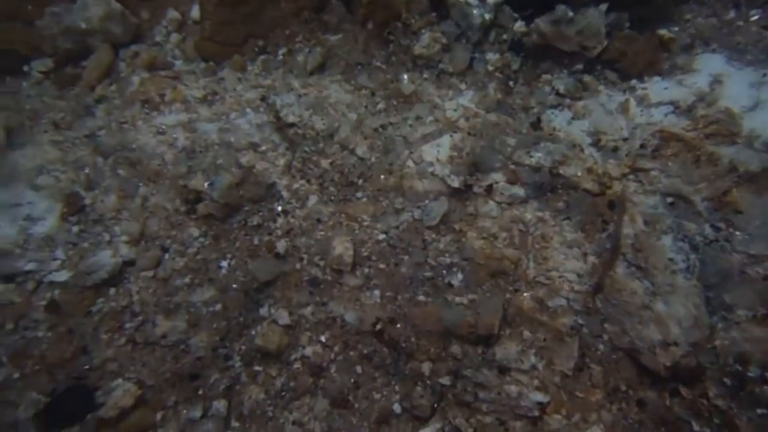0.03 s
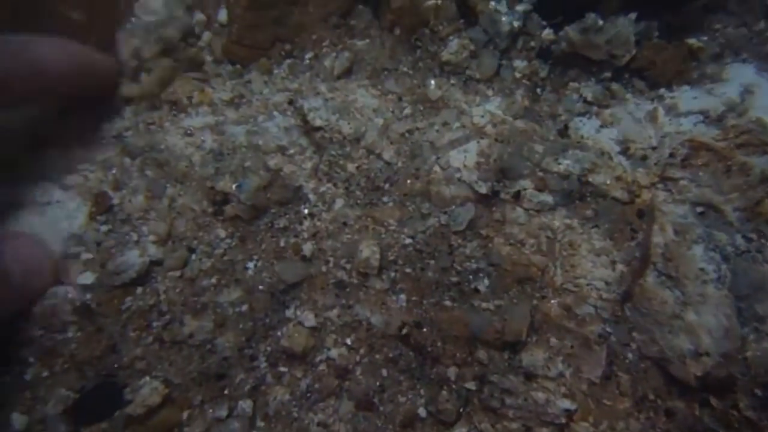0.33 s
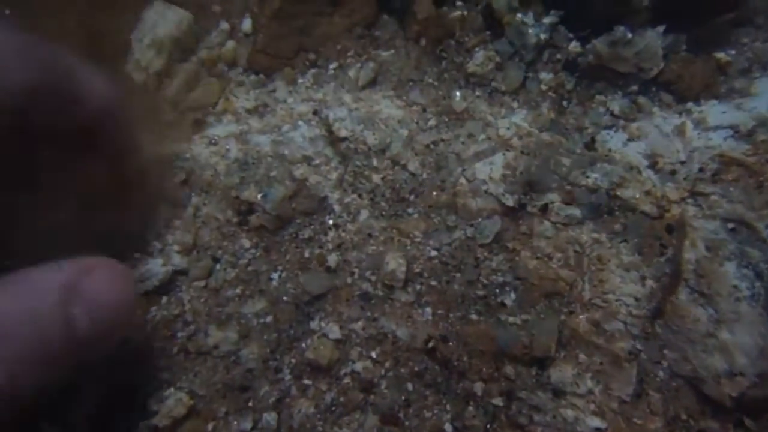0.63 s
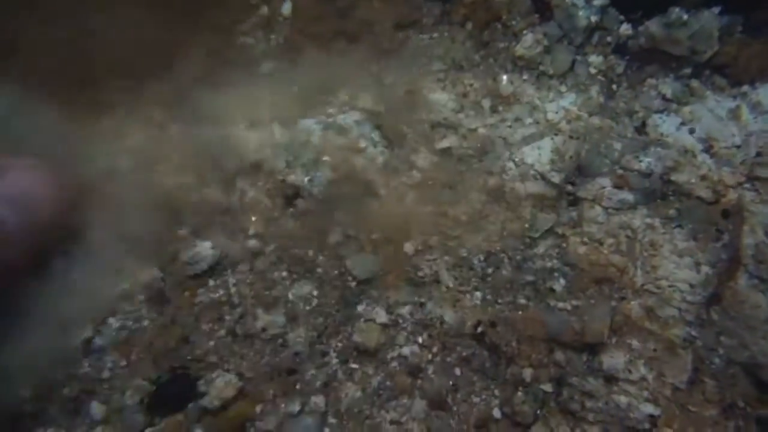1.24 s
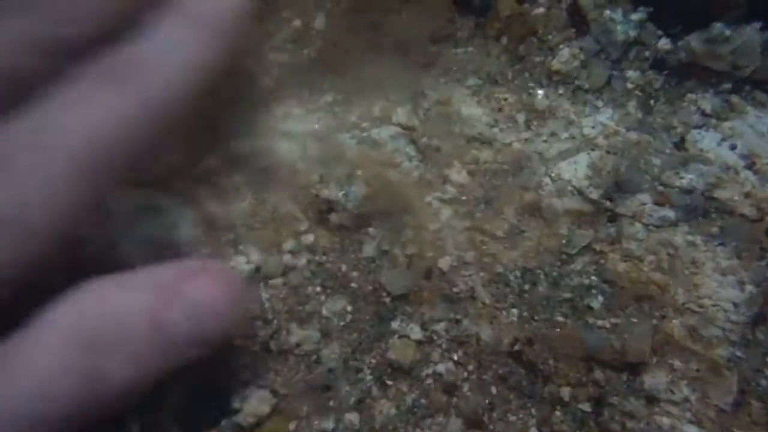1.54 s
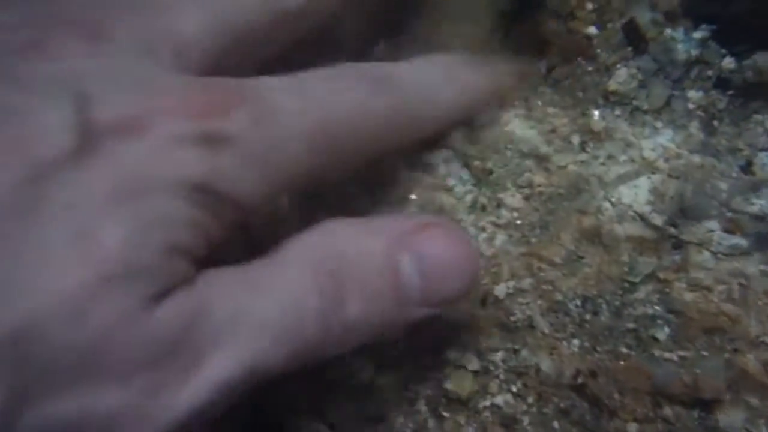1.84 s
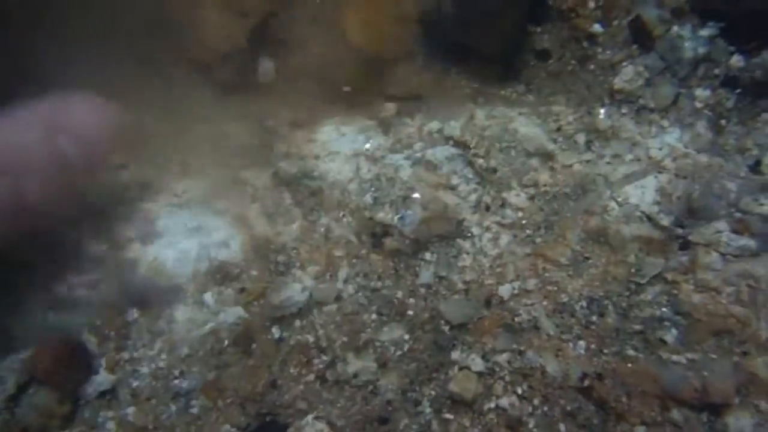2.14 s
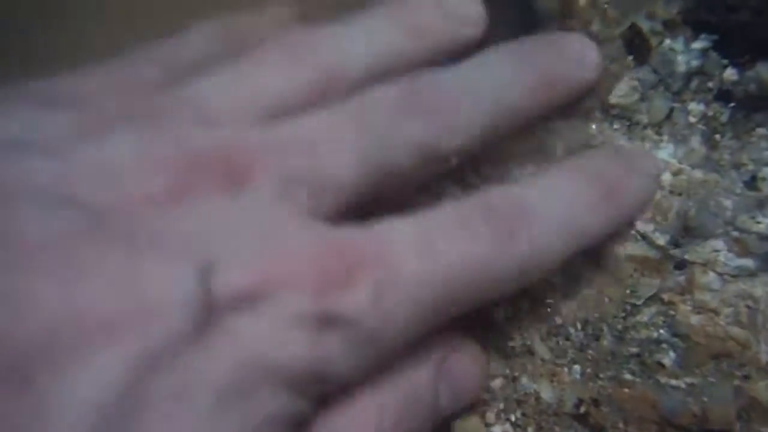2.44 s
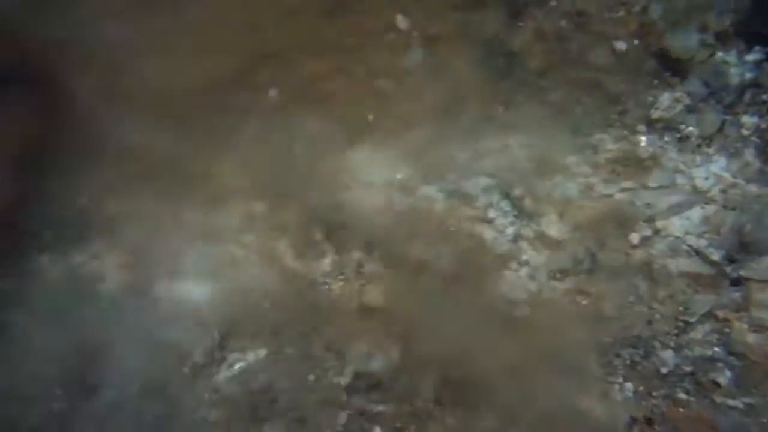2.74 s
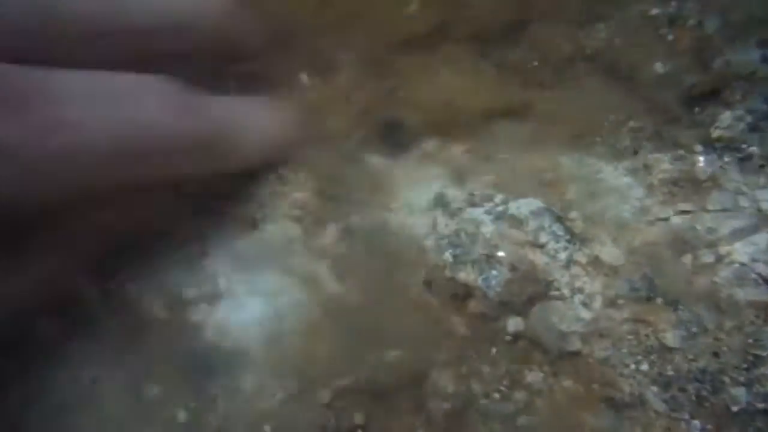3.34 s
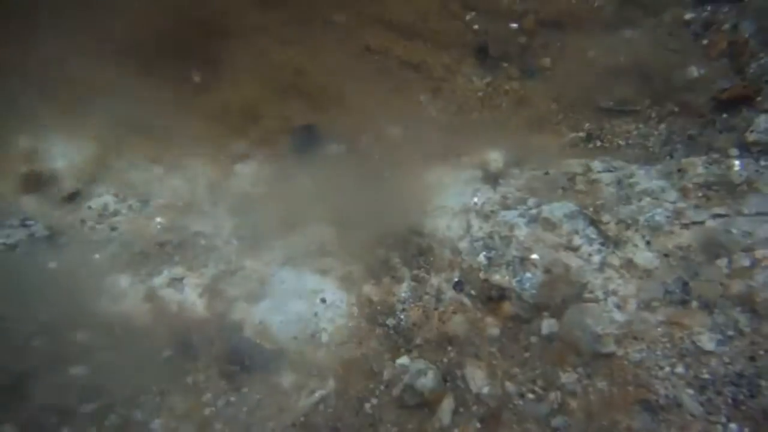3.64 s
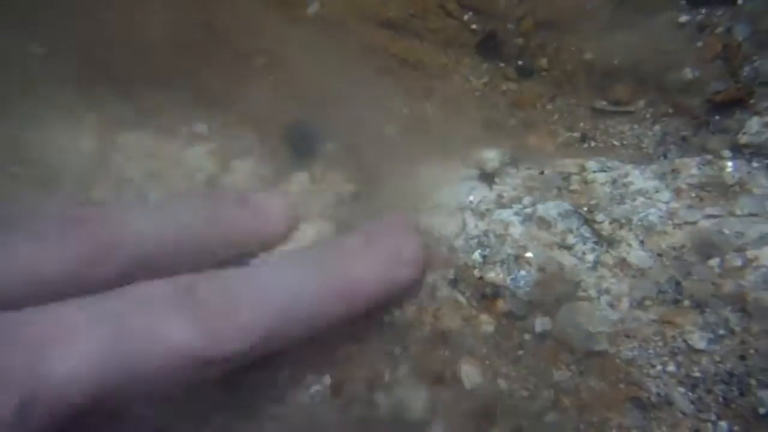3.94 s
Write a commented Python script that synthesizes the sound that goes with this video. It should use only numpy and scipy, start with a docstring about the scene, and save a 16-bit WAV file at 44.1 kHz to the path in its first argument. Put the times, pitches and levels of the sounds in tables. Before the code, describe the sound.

Underwater gravel crunches under repeated hand strokes, with low rumbling water and soft microphone bumps.

```python
"""A deep rumble of pushed water, then the crunch of a hand sweeping six times over submerged gravel.
The microphone is under water, close to the hand, inside a camera's sealed housing. Grains crunch and
tick through the housing's resonances, stones squeak and click, and the rubbing makes the housing growl.
Bumps on it thud and overload the microphone; behind it all the electronics hiss and whine faintly."""
import sys
import numpy as np
from scipy import signal
from scipy.fft import rfft, irfft
from scipy.io import wavfile
from scipy.ndimage import uniform_filter1d

SR = 44100
rng = np.random.default_rng(int(sys.argv[2]) if len(sys.argv) > 2 else 0)


def transcribe(signal):
    """Save signal, clipped to [-1, 1], as a 16-bit WAV file at the path in sys.argv[1]."""
    frames = np.atleast_2d(signal).T
    limited = np.clip(frames, -1, 1)
    pcm = np.round(limited * 32767).astype(np.int16)
    wavfile.write(sys.argv[1], SR, pcm)


N = 176400
T = np.arange(N) / SR

# the housing's high resonances, heard in fine sand and pebble cracks: frequency_hz, level_db
HOUSING_TREBLE = [(4000, -42.5), (4850, -21.5), (5200, -4.5), (5560, 2.5), (6100, -12.5), (6700, -5.5),
                  (7250, -12), (7650, -10.5), (8500, -18), (10200, -17.5), (11300, -40), (12800, -22.5),
                  (14000, -41), (15500, -35)]


def from_db(db):
    """Decibels to gain."""
    return 10 ** (np.asarray(db) / 20)


def unit_rms(x):
    """Scale to unit power."""
    return x / np.sqrt(np.mean(x ** 2) + 1e-20)


def curves(tables):
    """Join tables in time order and draw one curve through each level column."""
    rows = np.vstack(tables)
    time_s, *columns = rows[np.argsort(rows[:, 0])].T
    return [np.interp(T, time_s, column) for column in columns]


def colour(x, spectrum):
    """Causal (minimum-phase) filter with the given spectrum; the result has unit power."""
    hz, db = np.transpose(spectrum)
    grid_hz = np.maximum(np.fft.rfftfreq(N, 1 / SR), 1)
    gain = from_db(np.interp(np.log(grid_hz), np.log(hz), db))
    cepstrum = irfft(np.log(gain), N)
    cepstrum[1:N // 2] *= 2
    cepstrum[N // 2 + 1:] = 0
    return unit_rms(irfft(rfft(x) * np.exp(rfft(cepstrum)), N))


def drift(rate_hz):
    """Random wander of unit power, mostly slower than rate_hz."""
    rolloff = 1 + (np.fft.rfftfreq(N, 1 / SR) / rate_hz) ** 2
    return unit_rms(irfft(rfft(rng.standard_normal(N)) / rolloff, N))


def eddies(spectrum, even_samples):
    """Turbulence in a low resonance, its level evened out over even_samples."""
    noise = colour(rng.standard_normal(N), spectrum)
    power = uniform_filter1d(uniform_filter1d(noise * noise, even_samples), even_samples)
    return noise / np.sqrt(power + 1e-9)


def ring(clicks, hz, cycles):
    """A unit click rings as a sine of height 1 and falls 60 dB in so many cycles."""
    angle = 2 * np.pi * hz / SR
    radius = np.exp(-np.log(1000) * hz / (cycles * SR))
    feedback = [1, -2 * radius * np.cos(angle), radius ** 2]
    return signal.lfilter([0, np.sin(angle)], feedback, clicks + 1e-18)


def contacts(per_s):
    """Random grain contacts: many small, a few large."""
    size_db = 3 * np.minimum(rng.exponential(1, N), 5)
    clicks = from_db(size_db) * rng.choice([-1, 1], N)
    return clicks * (rng.random(N) < per_s / SR)


def water():
    """Pushed water surges against the housing and sloshes round it."""
    # water moving at the housing, in groups of rows: time_s, surge_db, slosh_db
    flow = [
        [(0.0, -20.5, -38), (0.42, -19, -20.5), (0.484, -12.5, -32), (0.63, -22, -33)],
        [(0.83, -14, -18), (0.91, -14.5, -47), (0.952, -19, -17), (1.29, -18, -28)],
        [(1.36, -24.5, -22), (1.54, -21.5, -22.5), (1.568, -20.5, -59), (1.69, -21, -26)],
        [(1.76, -13.5, -17.5), (1.944, -23.5, -23.5), (2.286, -15.5, -26.5), (2.35, -26, -36)],
        [(2.39, -17, -26.5), (2.58, -18.5, -19), (2.852, -28, -42), (2.96, -21.5, -29.5)],
        [(3.03, -20.5, -46), (3.278, -22, -12), (3.41, -22.5, -28), (3.45, -29, -34)],
        [(3.5, -26.5, -39), (3.744, -23.5, -45), (3.888, -15, -20.5), (3.99, -21, -18)],
    ]
    # the deep surge: frequency_hz, level_db
    surge_spectrum = [(10, -18), (22, 10.5), (38, 13.5), (65, 7), (90, -3.5), (140, -33.5), (1000, -110)]
    # the slosh: frequency_hz, level_db
    slosh_spectrum = [(60, -16.5), (95, 6.5), (125, 4), (165, -1.5), (230, -14.5), (750, -115)]
    surge_db, slosh_db = curves(flow)
    flutter_db = 3.5 * drift(rate_hz=34)
    surge = from_db(surge_db - 0.5 + flutter_db) * eddies(surge_spectrum, even_samples=5000)
    slosh = from_db(slosh_db - 1) * eddies(slosh_spectrum, even_samples=1800)
    return surge + slosh


def rubbing(growl_db):
    """The dragging hand shakes the housing in its low resonance."""
    # the housing's growl: frequency_hz, level_db
    growl_spectrum = [(120, -24), (190, -1), (260, 6.5), (330, -3.5), (400, -11.5), (480, -12),
                      (560, -37.5), (800, -32.5), (1200, -61), (4000, -105)]
    roughness_db = 3.5 * drift(rate_hz=41)
    return from_db(growl_db + roughness_db) * eddies(growl_spectrum, even_samples=1200)


def gravel(grit_db, sand_db):
    """Coarse grit and fine sand crunch in shared clumps, louder where a patch gives way."""
    # coarse grit heard through the housing: frequency_hz, level_db
    grit_spectrum = [(500, 12), (800, 4.5), (1200, 7), (1550, -5.5), (1820, -1), (2100, 7), (2500, -0.5),
                     (2900, -2.5), (3500, -3), (4100, 2), (4550, 0), (4900, -15), (6000, -50)]
    clumps = unit_rms(from_db(3 * drift(rate_hz=47.6)))
    slips = gravel_slips()
    grit = colour(clumps * contacts(per_s=6000), grit_spectrum)
    sand = colour(clumps * contacts(per_s=6000), HOUSING_TREBLE)
    grit_gain = from_db(grit_db + 0.5) + slips
    sand_gain = from_db(sand_db - 4) + from_db(-3) * slips
    return grit_gain * grit + sand_gain * sand


def chinks(sand_db):
    """Some grains ring at a pitch of their own; their level loosely follows the sand's."""
    # tone balance of the ringing grains: frequency_hz, gain_db
    chink_spectrum = [(4000, -1.5), (4800, -21), (5600, -0.5), (7500, 7), (11000, -7.5), (13000, -11.5)]
    pitches_hz = np.geomspace(4100, 13500, 24)
    clicks = contacts(per_s=280)
    pitch_index = rng.integers(0, len(pitches_hz), N)
    rings = sum(ring(clicks * (pitch_index == k), hz, cycles=63) for k, hz in enumerate(pitches_hz))
    return from_db(0.5 * sand_db - 32.5) * colour(rings, chink_spectrum)


def electronics():
    """The camera's circuits add a steady hiss and a thin whine."""
    # noise floor: frequency_hz, level_db
    hiss_spectrum = [(150, 4), (300, 20), (500, 7), (700, 0), (1000, 0.5), (1200, 6), (1600, -12.5),
                     (2200, -11.5), (3200, -14), (4800, -14.5), (5600, -4.5), (6300, -17.5), (7900, -10),
                     (8800, -19), (12000, -13.5), (15500, -17.5)]
    # steady tones: pitch_hz, rms_db
    tones = [(7837, -77), (7897, -67.5), (15734, -71)]
    whine = sum(from_db(db) * np.sqrt(2) * np.sin(2 * np.pi * hz * T) for hz, db in tones)
    return from_db(-50) * colour(rng.standard_normal(N), hiss_spectrum) + whine


def squeaks_and_ticks():
    """Thin stone squeaks and brief pitched ticks: rapid tiny contacts ring a stone for a moment."""
    # thin squeaks and brief pitched ticks: centre_s, level_db, pitch_hz, half_length_s
    bursts = [(0.183, -45, 6940, 0.064), (1.088, -38.5, 6750, 0.008), (1.678, -47.5, 12300, .007),
              (1.993, -42, 4060, 0.0029), (2.106, -43.5, 4330, 0.0017), (2.404, -40.5, 12300, 0.005),
              (2.437, -46, 12600, 0.005), (3.214, -39, 6760, 0.008)]
    out = np.zeros(N)
    for centre_s, db, hz, half_length_s in bursts:
        envelope = np.exp(-np.minimum(((T - centre_s) / half_length_s) ** 2, 50))
        out += from_db(db) * envelope * unit_rms(ring(contacts(per_s=1100), hz, cycles=34))
    return out


def pebbles():
    """Single pebbles click: a short ring of the stone and a crack through the housing."""
    # pebble strikes: start_s, strength_db
    strikes = [(0.412, -18.5), (0.4504, -35), (0.5974, -37), (0.841, -43), (0.9441, -31), (0.991, -26.5),
               (1.185, -36), (1.424, -45), (1.6078, -35), (1.6198, -33), (1.6467, -31), (1.9363, -24),
               (1.9714, -24.5), (2.3408, -31), (2.3954, -31), (2.4128, -18), (2.5503, -23), (2.6782, -29),
               (2.8473, -35), (3.38, -29), (3.6262, -35.5), (3.701, -40), (3.7258, -33)]
    rings, clicks = np.zeros(N), np.zeros(N)
    for start_s, db in strikes:
        pitch_hz = 5660 * np.exp(0.087 * rng.standard_normal())
        click = np.zeros(N)
        click[int(start_s * SR)] = from_db(db - 5.5)
        rings += ring(click, pitch_hz, cycles=59)
        clicks += click
    cracks = colour(clicks, HOUSING_TREBLE)
    crack_peak = from_db(1.5) * clicks.max()
    return rings + crack_peak * cracks / np.abs(cracks).max()


def bumps():
    """A soft blow swells quickly, shoves the housing and leaves it swinging for a few cycles."""
    # blows on the housing: peak_s, swing_db, pitch_hz, swell_s, decay_s, shove_ratio (one-sided push)
    blows = [(0.414, -5.5, 227, 0.0028, 0.0051, 0.71), (0.4342, -5.5, 213, 0.0019, 0.0027, 0.13),
             (0.665, -3.5, 113, 0.0094, 0.0066, -0.15), (0.7782, 6.5, 122.6, 0.0057, 0.0095, 0.15),
             (0.987, -5.5, 120, 0.0064, 0.012, 0.52), (1.088, -8.5, 208, 0.0042, 0.0063, 0.25),
             (1.312, 0.5, 127.6, 0.0021, 0.0098, -0.15), (1.279, -8, 115, 0.011, 0.011, 0.43),
             (1.347, -12, 123, 0.017, 0.014, 1), (1.71, -1, 65, 0.012, 0.025, 0),
             (1.825, -2.5, 98, 0.0036, 0.0086, 0.02), (2.0833, -3.5, 108.4, 0.0057, 0.0038, -0.42),
             (2.241, -11.5, 134.7, 0.012, 0.02, 0.018), (2.3676, -0.5, 249, 0.0013, 0.0019, 0.1),
             (2.561, -7, 248, 0.0028, 0.015, 0.91), (2.9878, 12, 244.4, 0.0013, 0.0031, -0.052),
             (2.9996, 2.5, 63.2, 0.0097, 0.0033, -0.44), (3.1507, -5, 55, .014, 0.022, -0.091),
             (3.262, -6, 253, 0.003, 0.0039, 0.25), (3.583, -18, 113.6, 0.012, 0.028, 0.19),
             (3.901, -1, 52.7, 0.0013, 0.003, 0.34)]
    sag_per_s, rounding_s = 10.9, 0.001  # the swing slows as it dies; its crest is rounded
    out = np.zeros(N)
    for peak_s, db, hz, swell_s, decay_s, shove in blows:
        before, after = np.minimum(T - peak_s, 0), np.maximum(T - peak_s, 0)
        rise = np.exp(-(before / swell_s) ** 2)
        fall = np.exp(-(np.hypot(after, rounding_s) - rounding_s) / decay_s)
        phase = 2 * np.pi * hz * (before + np.log1p(sag_per_s * after) / sag_per_s)
        out += from_db(db) * rise * fall * (np.cos(phase) + shove)
    return out


def snaps():
    """Dry, toneless ticks ride on the heaviest overloads: each a small jump that dies at once."""
    # overload ticks: start_s, peak_db
    ticks = [(0.416, -23.5), (0.675, -27), (0.79, -25.5), (1.71, -21), (1.7327, -23), (2.987, -34)]
    decay_s = 0.00017
    jumps = np.zeros(N)
    for start_s, db in ticks:
        jumps[int(start_s * SR)] = from_db(db)
    return signal.lfilter([1], [1, -np.exp(-1 / (decay_s * SR))], jumps + 1e-18)


def gravel_slips():
    """Envelope of the fingers catching and a patch of gravel giving way: quick rise, steady decay."""
    # sudden slips: peak_s, level_db, decay_s
    slips = [(0.984, -38, 0.01), (1.825, -26.5, 0.0059), (1.862, -30, 0.038), (2.07, -43, 0.0043),
             (2.416, -36.5, 0.014), (2.548, -50, 0.008), (3.141, -39.5, 0.016)]
    attack_s = 0.0045
    return sum(from_db(db) * np.exp(-np.maximum((peak_s - T) / attack_s, (T - peak_s) / decay_s))
               for peak_s, db, decay_s in slips)


def scene():
    """Hand, gravel and water, all close to the one microphone in its housing."""
    # the hand's strokes, one group of rows each: time_s, grit_db, sand_db, growl_db
    sweeps = [
        [(0.0, -55, -56, -43), (0.13, -62.5, -56, -34), (0.34, -50.5, -44.5, -22), (0.385, -53, -47.5, -31),
         (0.412, -45, -42, -19), (0.468, -55.5, -49, -20.5), (0.526, -67, -59, -46.5), (0.62, -59, -63.5, -49)],
        [(0.83, -93, -79, -24), (0.84, -69, -41, -47), (0.88, -59.5, -52.5, -35.5), (0.978, -45, -41, -21),
         (1.1, -50.5, -47, -21), (1.166, -70, -64, -51), (1.184, -47, -60, -29), (1.225, -78, -62, -41)],
        [(1.56, -93.5, -91, -40), (1.655, -58, -52.5, -31), (1.7, -43, -42, -22), (1.768, -43, -47.5, -25),
         (1.884, -55.5, -61, -22.5), (1.944, -37, -54, -23), (2.01, -77, -62, -47), (2.055, -54, -79, -30)],
        [(2.385, -62, -63, -35), (2.393, -39, -37, -52), (2.411, -55, -44, -18), (2.479, -34, -33.5, -23),
         (2.583, -38.5, -37, -16), (2.663, -57, -52.5, -21.5), (2.709, -46.5, -43, -21.5),
         (2.77, -76, -66, -38.5)],
        [(3.115, -79, -66, -39.5), (3.136, -53, -65, -17.5), (3.186, -40.5, -41, -30.5),
         (3.274, -46.5, -43, -18.5), (3.36, -69, -70, -21.5), (3.376, -46.5, -45, -16.5), (3.42, -60, -50, -27),
         (3.5, -80, -59, -33), (3.55, -71, -60, -53)],
        [(3.84, -59, -53, -37), (3.86, -54, -50, -27), (3.89, -65, -60, -42), (3.9, -51, -40.5, -11),
         (3.932, -55, -47.5, -37.5), (3.958, -51, -44, -18), (3.972, -40, -37, -21), (3.985, -43, -46, -10)],
    ]
    # the hand drawing back between strokes: time_s, grit_db, sand_db, growl_db
    draw_backs = [
        [(2.14, -61, -62, -40.5), (2.168, -60, -66, -42), (2.35, -56, -47, -27)],
        [(3.6, -69, -58.5, -46.5), (3.718, -56.5, -56.5, -31.5), (3.8, -55, -53, -36.5)],
    ]
    grit_db, sand_db, growl_db = curves(list(sweeps) + list(draw_backs))
    stones = gravel(grit_db, sand_db) + chinks(sand_db) + squeaks_and_ticks() + pebbles()
    return (stones + rubbing(growl_db) + water() + bumps())[None]


def record(dry):
    """The microphone overloads with flat tops; snaps and circuit noise join; both band ends are cut."""
    ceiling, knee_order = 0.567, 60
    low_cut_hz, high_cut_hz = 4, 15800
    clipped = dry / (1 + np.abs(dry / ceiling) ** knee_order) ** (1 / knee_order)
    low_cut = signal.butter(1, low_cut_hz, "high", fs=SR, output="sos")
    high_cut = signal.ellip(12, 0.1, 80, high_cut_hz, fs=SR, output="sos")
    coupled = signal.sosfilt(low_cut, clipped + snaps() + electronics())
    return signal.sosfilt(high_cut, coupled)


dry = scene()
out = record(dry)
transcribe(out)
```